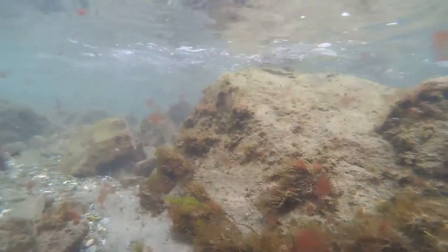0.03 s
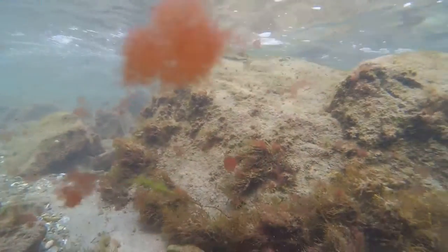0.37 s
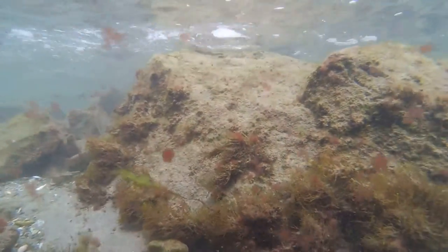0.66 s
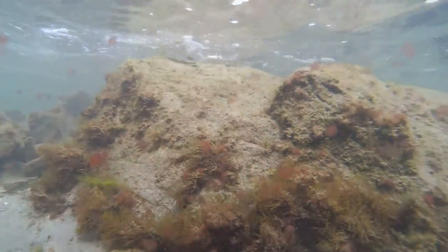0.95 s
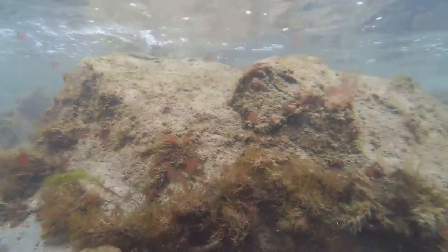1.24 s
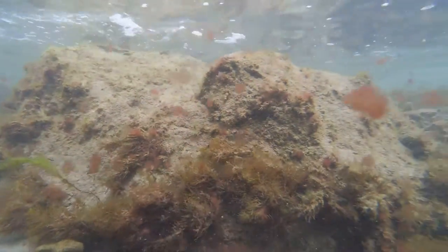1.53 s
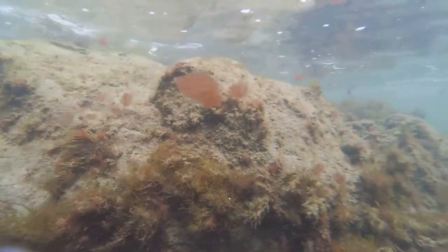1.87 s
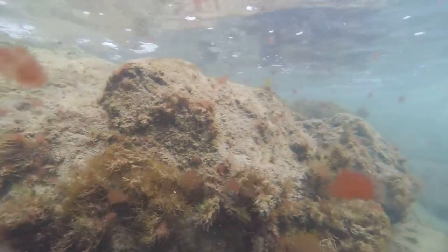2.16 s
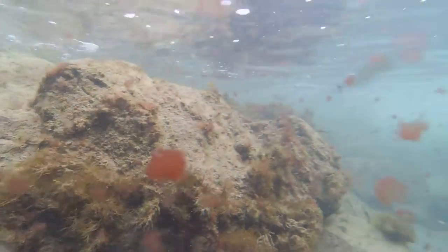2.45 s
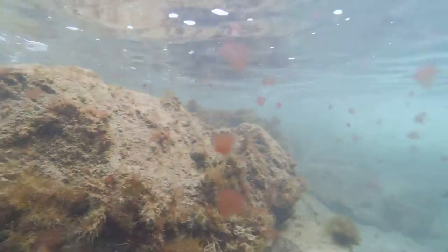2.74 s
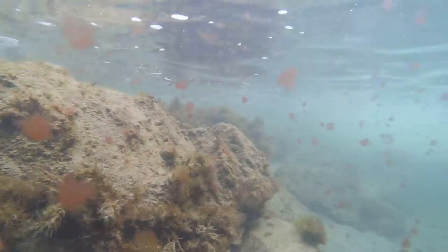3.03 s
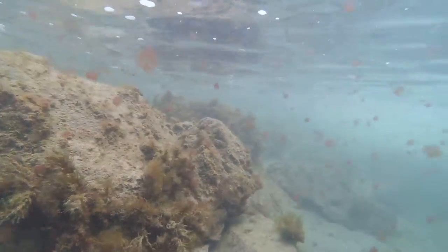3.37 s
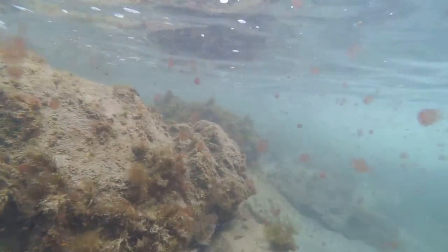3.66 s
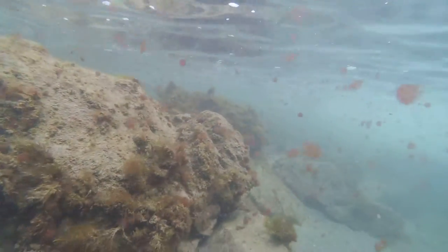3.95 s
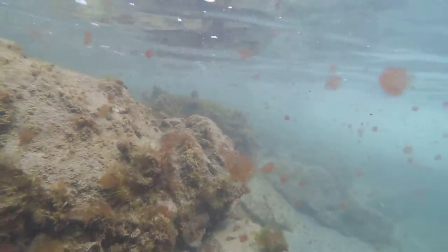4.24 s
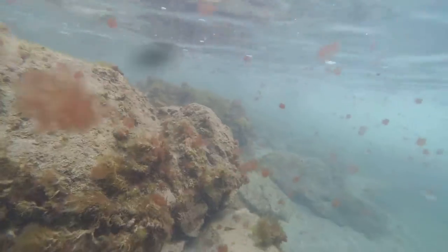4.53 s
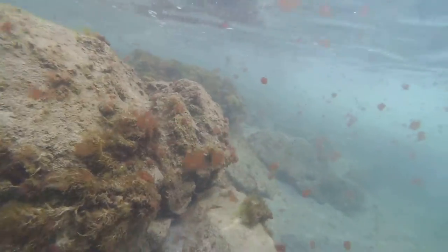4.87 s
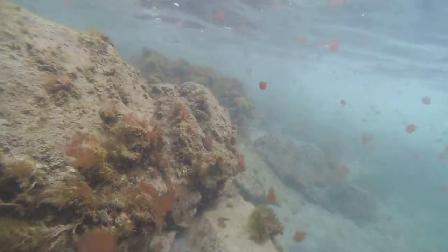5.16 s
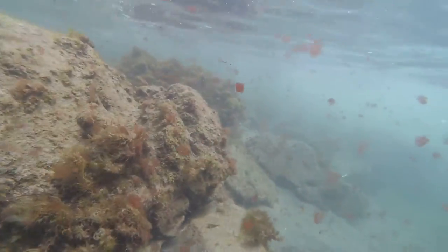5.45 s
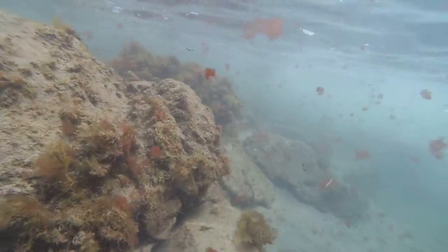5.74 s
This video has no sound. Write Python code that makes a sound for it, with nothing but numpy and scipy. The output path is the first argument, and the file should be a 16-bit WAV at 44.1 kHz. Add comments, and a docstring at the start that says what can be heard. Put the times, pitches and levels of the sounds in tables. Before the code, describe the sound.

Shallow water churns dully, heard from below the surface, with scattered knocks, plopping bubbles and a late bubbly hiss from breaking wavelets.

```python
"""Shallow sea water heard from a camera in a waterproof case, drifting over weedy rocks.
From the start the swell rumbles, eddies churn and the electronics hiss faintly. Bubbles plop as they
pinch off and water swishes past; then knocks and grit ring the walls, the swell shoves the case and
something soft rubs it. The flow surges, most strongly from about 4 s. Near the end wavelets break
overhead: larger bubbles plop, and a cloud of small ones fizzes under the spray."""
import sys
import numpy as np
from scipy import signal
from scipy.fft import rfft, irfft, next_fast_len
from scipy.io import wavfile
from scipy.ndimage import uniform_filter1d

SR = 44100
rng = np.random.default_rng(int(sys.argv[2]) if len(sys.argv) > 2 else 0)


def store_wav(level_fs):
    """Save 16-bit WAV to argv[1]."""
    pcm = np.round(np.clip(np.atleast_2d(level_fs), -1, 1) * 32767)
    wavfile.write(sys.argv[1], SR, pcm.T.astype(np.int16))


N = 260190
T = np.arange(N) / SR

# Spectra of the sources. Each row: frequency in Hz, relative level in dB.
SWELL_SPECTRUM = [(3, -23.5), (8, 8.5), (16, -2.5), (25, -1.5), (40, -17.5), (60, -23.5), (90, -44),
                  (160, -69.5), (400, -77)]
CHURN_SPECTRUM = [(25, -10), (50, 10), (80, 4), (140, -3), (250, -8.5), (400, -18), (800, -31),
                  (2000, -66.5)]
WASH_SPECTRUM = [(200, -19), (380, -11.5), (490, -4.5), (580, -3), (630, -5), (685, 0.5), (780, -15),
                 (900, -11), (1050, -20.5), (2000, -28.5)]
HISS_SPECTRUM = [(900, -11), (1200, 4.5), (1600, 2), (2400, -2), (3200, 1.5), (3950, 3), (4400, -15.5),
                 (5400, 0), (6100, -3), (6700, 1), (7400, -5.5), (8600, 1), (9800, -10.5), (11300, -3.5),
                 (12200, -10), (13500, -18), (15500, -14)]
SWISH_SPECTRUM = [(150, -0.5), (350, -7.5), (750, 5), (1030, -5), (1550, 4), (1800, -1), (2100, 0),
                  (2500, 0.5), (3200, -10.5), (3850, -4.5), (4150, -15), (4330, 1.5), (4550, -16),
                  (5000, -7), (5700, -8.5), (5880, -7.5), (6100, -17), (6850, -14), (8200, -16.5),
                  (9500, -25), (14000, -49)]
RUB_SPECTRUM = [(600, -27), (1200, -9), (1530, 6), (1850, -3), (2250, -7), (3200, -17), (3900, -12),
                (4500, -18), (9000, -24.5)]
TICK_SPECTRUM = [(2500, -40), (5900, -4), (6300, -7), (6850, 1.5), (7400, -19), (7850, 3), (8400, -9),
                 (9000, -7), (10500, -4), (11200, -3.5), (12000, -6.5), (13000, -12.5), (15500, -25)]
FIZZ_SPECTRUM = [(500, -15), (900, -11), (1150, -0.5), (1600, 4), (1900, -2), (2200, -1), (2600, -5),
                 (3100, -2), (3800, -7), (5500, -12), (9000, -60)]
SPRAY_SPECTRUM = [(1200, -10.5), (1950, -3.5), (2200, 2.5), (2620, 1), (3100, -23), (4200, -21),
                  (6000, -16), (8500, -19), (10300, -18.5), (12000, -24.5), (15500, -35)]
# Surges past the case. Each row: centre in seconds, length in seconds, rise of the flow in dB.
FLOW_SURGES = [(2.52, 0.12, 3.5), (4.01, 0.63, 5.5), (5.27, 0.31, 5.5)]
# Shoves of water on the case. Each row: centre in seconds, frequency in Hz, level in dB.
WATER_SHOVES = [(0.528, 61, -35.5), (0.684, 250, -50.5), (0.702, 26.3, -20.5), (1.74, 19.5, -31),
                (3.178, 36, -42.5), (3.186, 190, -53.5), (3.764, 43, -45), (3.901, 90, -47.5),
                (3.973, 79, -47), (4.141, 200, -50), (4.257, 290, -49), (4.283, 54, -37.5),
                (4.508, 105, -41), (4.99, 31, -38), (5.129, 136, -45), (5.468, 150, -49)]
# Whine of the electronics. Each row: frequency in Hz, rms level in dB.
WHINE_TONES = [(4000, -91.5), (5000, -87.5), (9000, -100)]
# Single near bubbles. Each row: start in seconds, pitch in Hz, level in dB.
NEAR_BUBBLES = [(.010, 876, -46.5), (.022, 1280, -41), (.201, 542, -53.5), (.045, 1320, -46),
                (1.432, 668, -49), (1.592, 7100, -47), (1.663, 536, -49), (1.664, 1755, -51.5),
                (2.941, 374.5, -48), (3.3427, 2160, -53.5), (3.78, 670, -55.5), (4.178, 694, -67),
                (4.39, 503, -53.5), (4.778, 2540, -52), (5.064, 494, -49), (5.161, 11200, -47),
                (5.133, 2020, -49), (5.193, 648, -47), (5.203, 1560, -47.5), (5.207, 2990, -52),
                (5.2176, 6800, -49), (5.224, 1184, -43), (5.24, 2260, -48.5), (5.261, 2940, -46),
                (5.3104, 7240, -50), (5.316, 1660, -51), (5.321, 2840, -48.5), (5.3508, 1420, -39.5),
                (5.373, 4440, -45), (5.385, 2750, -41), (5.398, 713, -44), (5.403, 2120, -47),
                (5.405, 1665, -46), (5.408, 565, -46), (5.426, 4530, -44.5), (5.471, 1090, -52.5),
                (5.477, 2800, -49), (5.511, 1730, -38), (5.519, 2430, -42), (5.68, 2730, -50),
                (5.687, 897, -42.5), (5.692, 1060, -47.5), (5.7324, 4780, -45.5), (5.768, 3700, -45),
                (5.7877, 2210, -42.5)]
# Air pockets breaking up. Each row: start in seconds, middle pitch in Hz, level of one bubble in dB.
AIR_POCKETS = [(.01, 1382, -46), (1.645, 1690, -68), (3.3, 556, -59.5), (3.385, 768, -64.5),
               (5.128, 1870, -51.5), (5.135, 670, -57.5), (5.215, 678, -58.5), (5.389, 1820, -60),
               (5.405, 585, -57.5)]
# Water sweeping over the case. Each row: centre in seconds, length in seconds, level in dB.
WATER_SWISHES = [(0.039, 0.084, -64), (0.226, 0.1, -63.5), (0.55, .04, -54.5), (0.679, 0.018, -58),
                 (4.506, 0.019, -57), (5.143, 0.0089, -63.5), (5.397, 0.0073, -55.5)]
# Something soft, likely weed, rubbing the wall so that it sings. Each row: as for the swishes.
WEED_RUBS = [(1.972, 0.035, -66), (3.62, 0.1, -68.5), (4.372, 0.049, -70), (4.585, 0.05, -70.5)]
# Normal modes of the case. Each row: frequency in Hz, relative level in dB, t60 in seconds.
CASE_MODES = [(250, -7, 0.013), (509, 5, 0.021), (675, 4.5, 0.037), (1110, 3, 0.0069), (1618, 8, 0.011),
              (2120, 7, 0.0065), (2514, -7, 0.025), (2817, 8, 0.0066), (3980, 4, 0.0083),
              (4780, 9.5, 0.0049)]
# Knocks on the case. Each row: start in seconds, level in dB, centre in Hz, spread over the modes
# in octaves, relative level of the bright tick in dB, relative level of the low thud in dB.
CASE_KNOCKS = [(0.42, -50.5, 1520, 0.13, -12, -32), (0.834, -44.5, 1890, 1.1, -42, -25),
               (0.8533, -36, 2300, 0.72, -47, -26), (0.986, -46, 2600, 0.97, -48, -25),
               (2.0654, -48, 1510, .35, -5.5, -31), (2.378, -48.5, 2110, 0.15, -18, -20),
               (2.6289, -53, 2230, 0.3, -20, -22), (2.6447, -46, 2480, 0.56, -3, -25),
               (3.458, -45, 1480, 0.4, -3.5, -16), (3.5709, -35, 2170, 0.48, -14.5, -16),
               (3.61, -42.5, 1750, 0.94, -7.5, -30), (4.0284, -33.5, 1530, 0.63, -9, -22),
               (4.4989, -40, 2600, 0.29, 5.5, -8), (4.5084, -40.5, 1400, 0.94, -17, -4),
               (4.540, -36, 1620, 0.24, -0.5, -28), (4.871, -27.5, 2160, 1, -22, -11),
               (4.885, -46.5, 2700, 0.78, -9, -13), (4.951, -36.5, 2680, 1.9, -12, -9),
               (5.3967, -35, 2500, 0.23, -50.5, -21), (5.639, -35, 2250, 0.4, -25, -23),
               (5.6442, -36.5, 2160, 0.36, -24, -3), (5.674, -45, 2000, 0.51, -30, -8),
               (5.7534, -40, 2380, 0.31, -15, -33)]
# Wavelets overhead. Each row: crest in seconds, build-up time constant in seconds, cloud level in dB,
# spray level in dB.
BREAKING_WAVELETS = [(4.36, 0.027, -86, -65.5), (4.62, 0.21, -70, -74.5), (5.2, 1, -73, -73),
                     (5.51, 0.031, -62, -51.5), (5.76, 0.15, -65.5, -60.5)]
# Transmission of the walls, which dips between resonances. Each row: frequency in Hz, gain in dB.
WALL_RESPONSE = [(1760, 0), (1900, -3.5), (2020, 2), (3060, 0.5), (3230, -5.5), (3450, -0.5)]

SWELL_DB, CHURN_DB, WASH_DB, FOAM_DB, SPRAY_DB = -45, -64.5, -68.5, -76.5, -83  # in slack water
SWELL_FOLLOWS, WASH_FOLLOWS = 0.6, 0.4  # dB per dB of flow
TOP_HZ = 15500


def undb(db):
    """Amplitude ratio of a level in decibels."""
    return 10 ** (np.asarray(db) / 20)


def unit(x):
    """Normalisation to rms 1."""
    return x / np.sqrt(np.mean(x ** 2))


def colour(x, points):
    """Minimum-phase filter: folding the cepstrum makes a (Hz, dB) response causal."""
    size = next_fast_len(len(x) // 2 + 2048) * 2
    hz, db = np.transpose(points)
    bin_hz = np.maximum(np.arange(size // 2 + 1) * SR / size, 1)
    gain = undb(np.interp(np.log(bin_hz), np.log(hz), db))
    cepstrum = irfft(np.log(gain))
    cepstrum[1:size // 2] *= 2
    cepstrum[size // 2 + 1:] = 0
    return irfft(rfft(x, size) * np.exp(rfft(cepstrum)))[:len(x)]


def noise(points):
    """Spectrally shaped Gaussian noise of rms 1."""
    return unit(colour(rng.standard_normal(N), points))


def wander(hz):
    """Random modulation: low-pass noise of rms 1."""
    return noise([(1, 0), (hz, 0), (2 * hz, -20), (10 * hz, -120)])


def even(x, span_s):
    """Division by the running rms steadies the loudness and leaves the faster detail."""
    return x / np.sqrt(uniform_filter1d(x ** 2, int(span_s * SR)) + 1e-9)


def add(out, s, x):
    """Superposition of a short sound, starting at s seconds."""
    i = int(np.clip(s * SR, 0, N - 1))
    out[i:i + len(x)] += x[:N - i]


def fade(t, t60):
    """Exponential damping by 60 dB in t60 seconds."""
    return np.exp(-np.log(1000) * t / t60)


def bell(t, length):
    """Gaussian envelope whose length spans two standard deviations."""
    return np.exp(-np.square(2 * t / length) / 2)


def flow_db():
    """Flow above slack water: the sum of surges that swell and ebb smoothly."""
    return sum(db * bell(T - s, length) for s, length, db in FLOW_SURGES)


def swell(rebound=2.07):
    """Slow pressure waves, and pulses in which the water sucks, presses and eases off more slowly."""
    out = even(noise(SWELL_SPECTRUM), 0.46) * undb(SWELL_DB + SWELL_FOLLOWS * flow_db())
    out *= np.minimum(T / .03, 1)
    for s, hz, db in WATER_SHOVES:
        spread = np.square(np.pi * hz * (T - s) / np.where(T > s, rebound, 1))
        out += undb(db) * (1 - 2 * spread) * np.exp(-np.minimum(spread, 50))  # lopsided Ricker pulse
    return out


def eddies():
    """Turbulence around the case: a low churn and a hollow wash flutter together."""
    flutter = wander(hz=27)
    churn = even(noise(CHURN_SPECTRUM) * undb(2.5 * flutter), 0.42)
    wash = even(noise(WASH_SPECTRUM) * undb(1.87 * flutter), 0.23)
    return churn * undb(CHURN_DB + flow_db()) + wash * undb(WASH_DB + WASH_FOLLOWS * flow_db())


def electronics(first_whirr_s=0.099, period_s=.421, whirr_s=0.051):
    """Self-noise: steady hiss with a narrow resonance, a thin whine and a faint periodic whirr."""
    whine = sum(np.sqrt(2) * undb(db) * np.sin(2 * np.pi * hz * T) for hz, db in WHINE_TONES)
    resonance = noise([(4000, -37.5), (4800, 2), (5030, 11), (5300, 2.5), (6500, -43)])
    from_whirr_s = (T - first_whirr_s + period_s / 2) % period_s - period_s / 2
    whirr = noise([(3300, -22), (3700, -6), (3850, -1.5), (4150, -20.5)]) * bell(from_whirr_s, whirr_s)
    return undb(-77.5) * noise(HISS_SPECTRUM) + undb(-83.5) * resonance + undb(-73) * whirr + whine


def bubble(hz, t60, rise, onset_s, pinch_sharp=0.2):
    """Damped oscillator: a bubble drops to pitch as it pinches off, then sharpens nearing the surface."""
    t = T[:int(t60 * SR) + 2]
    formed = 1 - np.exp(-t / onset_s)
    cycles = hz * (t * (1 + rise * t / t60 / 2) + pinch_sharp * onset_s * formed)
    return np.sin(2 * np.pi * cycles) * fade(t, t60) * formed


def shed(parents, within_s=0.024, octaves=1.324, weaker_db=-11, count=2):
    """Fragmentation: a newborn bubble sheds weaker, mostly smaller ones. Rows as in NEAR_BUBBLES."""
    rows = [(s + within_s * when, hz * 2 ** (octaves * (pitch - .25)), db + weaker_db)
            for s, hz, db in parents for when, pitch in rng.random((count, 2))]
    return [(s, hz, db) for s, hz, db in rows if hz < TOP_HZ]


def gulps(breakup_s=.05, octaves=0.24, count=8):
    """Break-up of air pockets into quick runs of like-sized bubbles. Rows as in NEAR_BUBBLES."""
    return [(s + breakup_s * (k + when) / count, hz * 2 ** (octaves * (pitch - .5)), db)
            for s, hz, db in AIR_POCKETS for k, (when, pitch) in enumerate(rng.random((count, 2)))]


def plops(longest_t60=0.12, most_cycles=63):
    """Reverberation between surface and rocks spreads each bubble's ring in time, conserving energy."""
    out = np.zeros(N)
    for s, hz, db in NEAR_BUBBLES + shed(NEAR_BUBBLES) + gulps():
        t60 = 1 / np.hypot(1 / longest_t60, hz / most_cycles)
        direct = bubble(hz, t60, rise=0.014, onset_s=0.00086)
        shallows = 0.046 * rng.standard_normal(4096) * fade(T[:4096], t60=0.035)
        shallows[0] += 1  # direct path
        heard = signal.fftconvolve(direct, shallows)
        add(out, s, undb(db) * heard * np.linalg.norm(direct) / np.linalg.norm(heard))
    return out


def gurgle(level_db=-60, low_hz=280, octaves=1.25, count=70):
    """Low, heavily damped resonances of bubbles shaken loose by the churning, louder in a surge."""
    out = np.zeros(N)
    for when, pitch, size in rng.random((count, 3)):
        ring = bubble(low_hz * 2 ** (octaves * pitch), t60=0.045, rise=0.07, onset_s=0.00041)
        add(out, when * N / SR, size ** 2 * undb(level_db) * ring)
    return out * undb(flow_db())


def rushes(events, spectrum):
    """Friction noise: grainy rushes swell and fade as water or weed sweeps over the case."""
    strength = sum(undb(db) * np.exp(-(2 * (T - s) / length) ** 4 / 2) for s, length, db in events)
    grain = undb(2.8 * wander(hz=300))
    return noise(spectrum) * strength * grain


def knock(hz, octaves, tick_db, thud_db, thud_hz=900):
    """A contact and its echoes excite the case's modes; weight adds a thud, hard grit a bright tick."""
    t = T[:4096]
    reach_hz = 3100 * 2 ** ((tick_db + 45.5) / 14)  # a soft contact cannot reach the upper modes
    ring = 0
    for k, (mode_hz, db, t60) in enumerate(CASE_MODES):
        contact = 1 / (1 + (np.log2(mode_hz / hz) / octaves) ** 2)
        contact /= np.hypot(1, (mode_hz / reach_hz) ** 4)
        thud = undb(thud_db) / (1 + (mode_hz / thud_hz) ** 4)
        mode = (-1) ** (k // 2) * np.sin(2 * np.pi * mode_hz * t) * fade(t, t60)
        ring += undb(db) * (contact + thud) * mode
    echo_decay = fade(t, 0.012) + undb(-28) * fade(t, .08)  # off rock and surface, near and far
    push = 0.15 * rng.standard_normal(len(t)) * echo_decay
    push[0] += 1  # the contact itself
    body = signal.fftconvolve(push, ring)[:len(t)]
    tick = colour(rng.standard_normal(len(t)) * (fade(t, 0.011) + fade(t, 0.0058)), TICK_SPECTRUM)
    return body / np.abs(body).max() + undb(tick_db) * tick / np.abs(tick).max()


def knocks(grit_db=-65, grit_count=16):
    """Impact excitation of the case: distinct knocks, and faint grit ticking at random."""
    out = np.zeros(N)
    for s, db, hz, octaves, tick_db, thud_db in CASE_KNOCKS:
        add(out, s, undb(db) * knock(hz, octaves, tick_db, thud_db))
    for when, size, pitch, hard in rng.random((grit_count, 4)):
        grit = knock(1200 + 2200 * pitch, octaves=0.79, tick_db=-22 + 14 * hard, thud_db=-30)
        add(out, when * N / SR, undb(grit_db) * (1 + size ** 2) * grit)
    return out


def surf(linger=1.14):
    """Gains of cloud and spray: incoherent wavelets build, die away and add in power to a steady seethe."""
    cloud_power, spray_power = undb(FOAM_DB) ** 2, undb(SPRAY_DB) ** 2
    for s, build_s, cloud_db, spray_db in BREAKING_WAVELETS:
        shape = np.exp(-np.abs(T - s) / (build_s * np.where(T > s, linger, 1)))
        cloud_power += (undb(cloud_db) * shape) ** 2
        spray_power += (undb(spray_db) * shape) ** 2
    return np.sqrt(cloud_power), np.sqrt(spray_power)


def foam(cycles=40, spread_db=4, count=5000):
    """Superposed resonances of tiny bubbles merge into a fizz, under a spray of bursting ones."""
    cloud = np.zeros(N)
    for when, pitch, size in rng.random((count, 3)):
        hz = 550 * 2 ** (3.1 * pitch ** .7)
        db = -spread_db * np.log(max(size, .01))
        ring = bubble(hz, cycles / hz, rise=0.12, onset_s=0.00016)
        add(cloud, when * N / SR, undb(db) * hz * ring)  # small bubbles die sooner, so start stronger
    cloud_gain, spray_gain = surf()
    fizz = unit(colour(cloud, FIZZ_SPECTRUM)) * cloud_gain
    spray = noise(SPRAY_SPECTRUM) * spray_gain * undb(2.7 * wander(hz=270))
    return fizz + spray


def pips(cycles=55, count=170):
    """Resonances of nearer small bubbles stand out of the foam as short high pips."""
    out = np.zeros(N)
    for when, pitch, size in rng.random((count, 3)):
        hz = 1200 * 2 ** (2.8 * pitch)
        ring = bubble(hz, cycles / hz, rise=0.21, onset_s=0.00052)
        add(out, when * N / SR, size * undb(5 - 4 * pitch) * ring)
    cloud_gain, _ = surf()
    return out * cloud_gain


def scene():
    """Transmission: the water's sound passes through the walls to one microphone; self-noise is added."""
    sweeps = rushes(WATER_SWISHES, SWISH_SPECTRUM) + rushes(WEED_RUBS, RUB_SPECTRUM)
    water = swell() + eddies() + sweeps + knocks() + plops() + gurgle() + foam() + pips()
    return (colour(water, WALL_RESPONSE) + electronics())[None]


def record(dry):
    """Band limiting: the camera cuts the top with a steep low-pass filter."""
    return signal.sosfilt(signal.ellip(10, .2, 70, TOP_HZ, fs=SR, output="sos"), dry)


dry = scene()
out = record(dry)
store_wav(out)
```